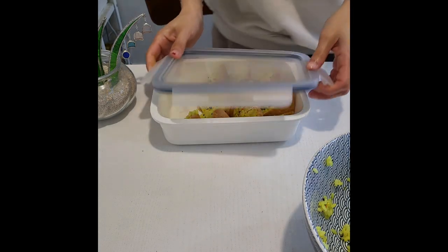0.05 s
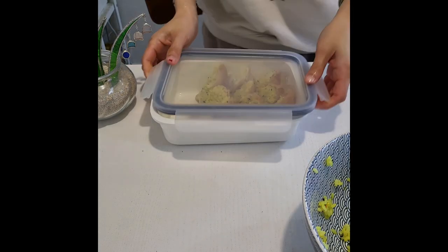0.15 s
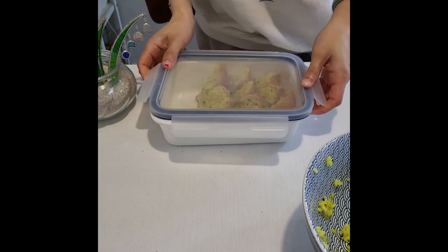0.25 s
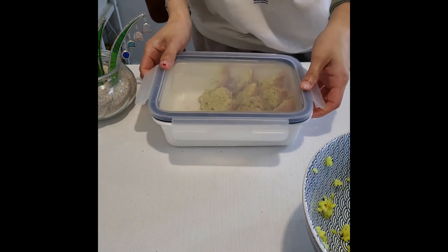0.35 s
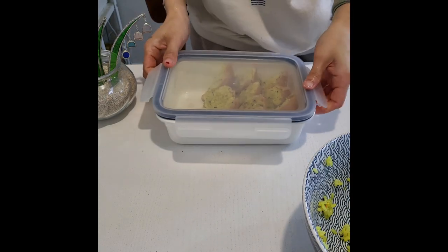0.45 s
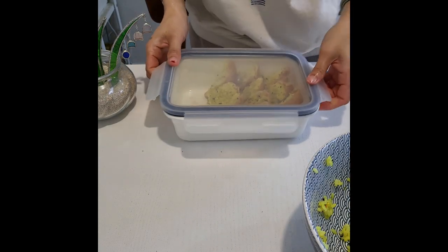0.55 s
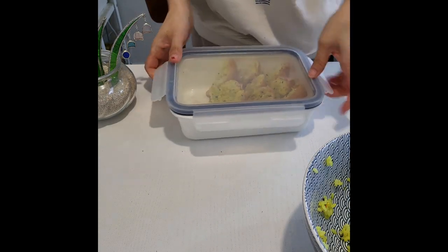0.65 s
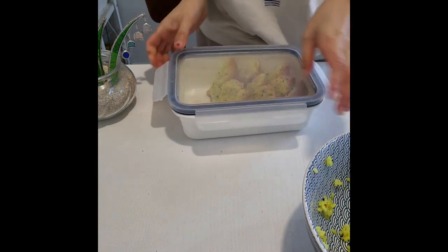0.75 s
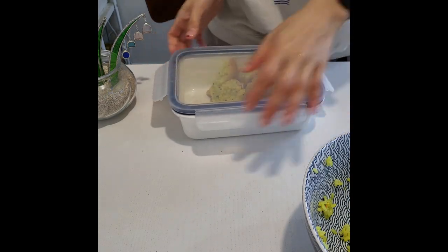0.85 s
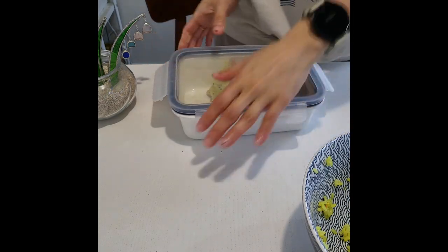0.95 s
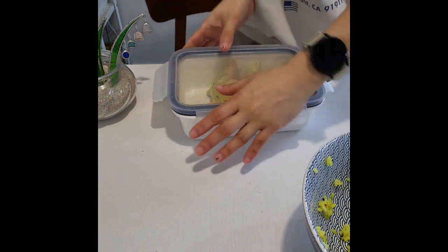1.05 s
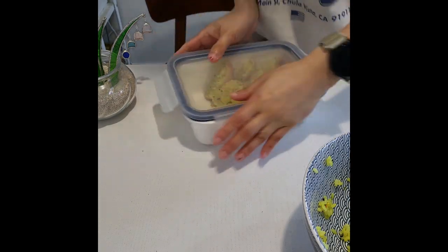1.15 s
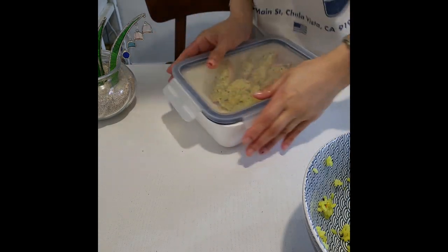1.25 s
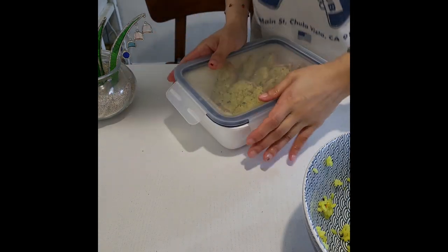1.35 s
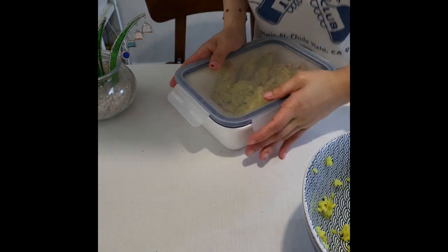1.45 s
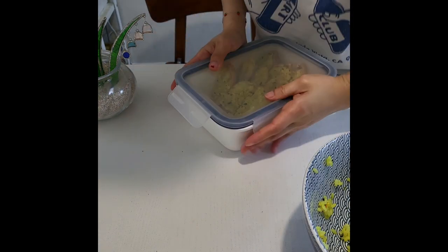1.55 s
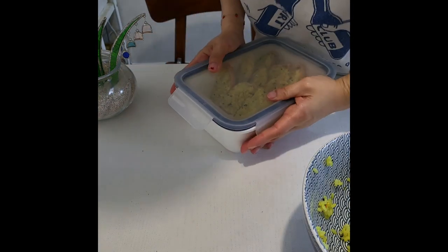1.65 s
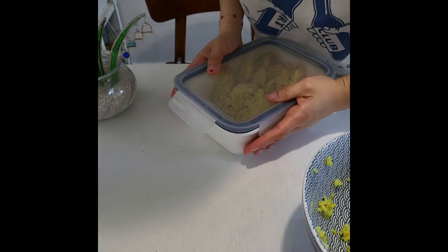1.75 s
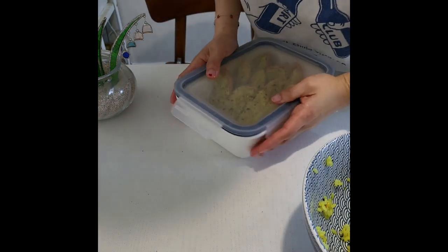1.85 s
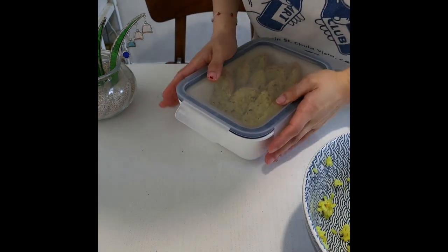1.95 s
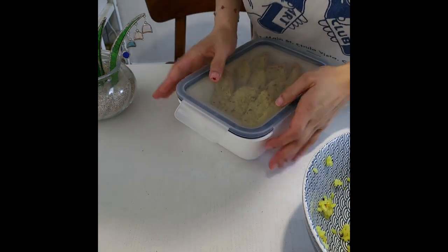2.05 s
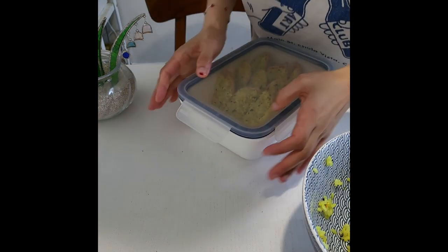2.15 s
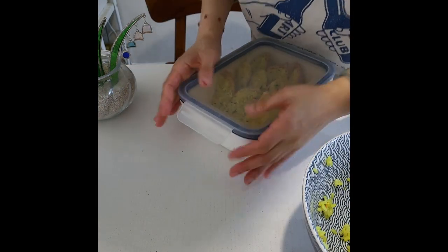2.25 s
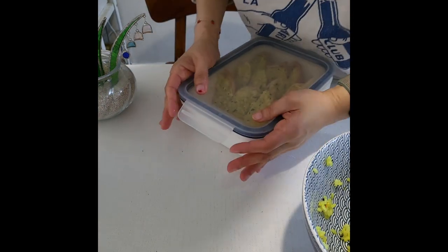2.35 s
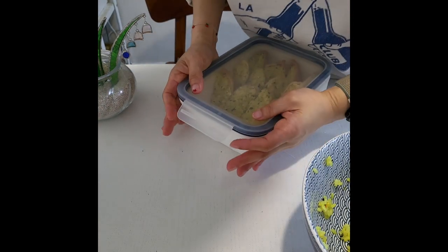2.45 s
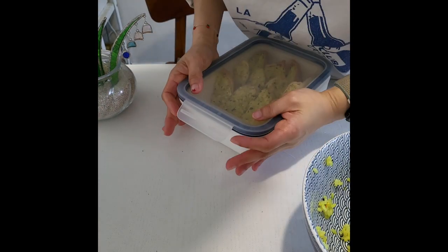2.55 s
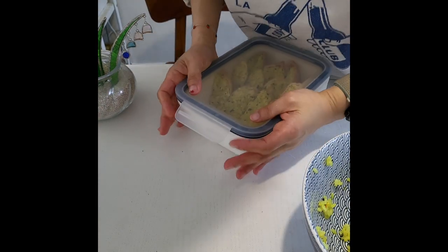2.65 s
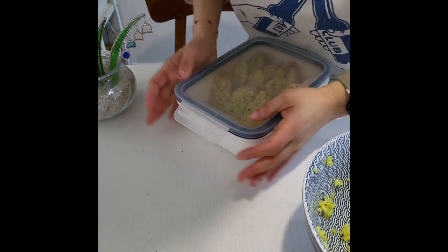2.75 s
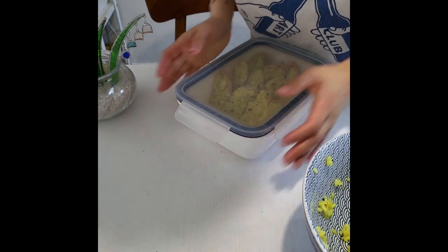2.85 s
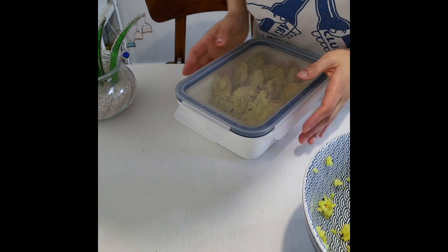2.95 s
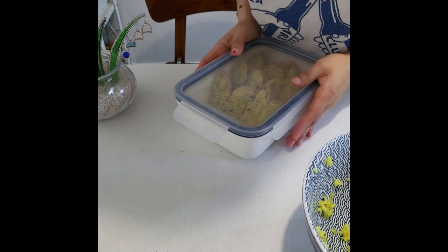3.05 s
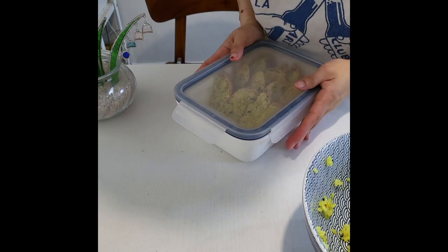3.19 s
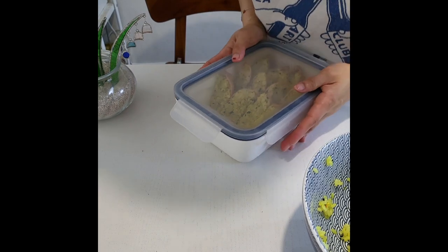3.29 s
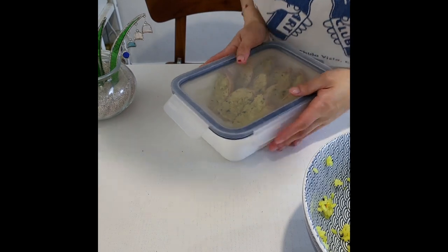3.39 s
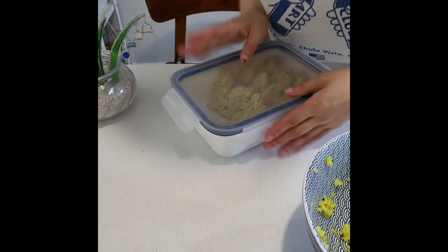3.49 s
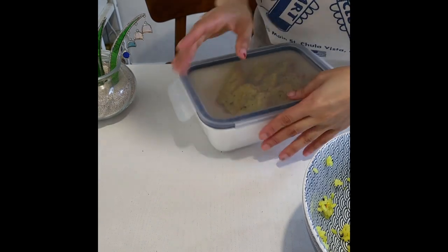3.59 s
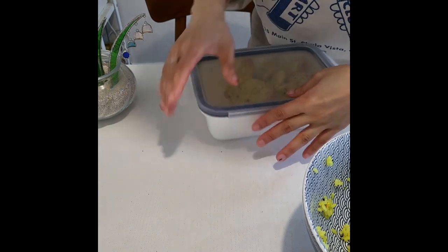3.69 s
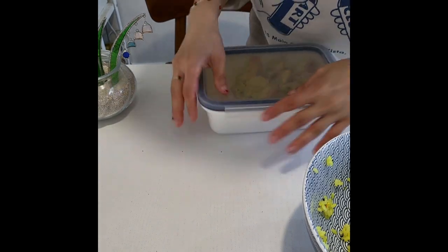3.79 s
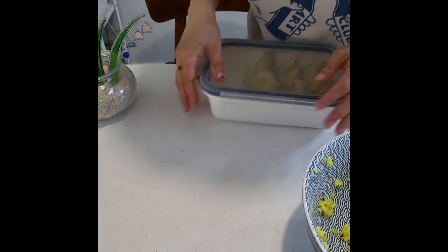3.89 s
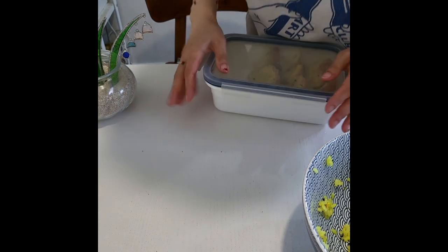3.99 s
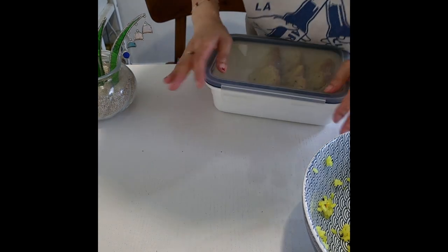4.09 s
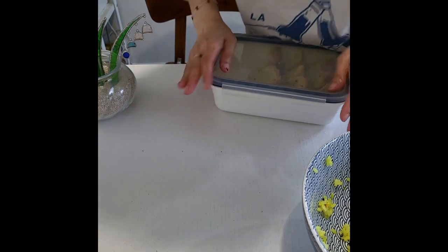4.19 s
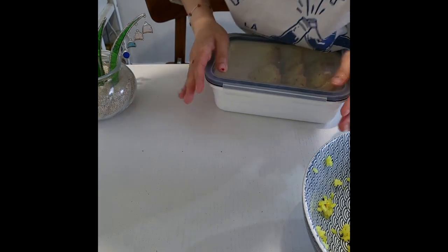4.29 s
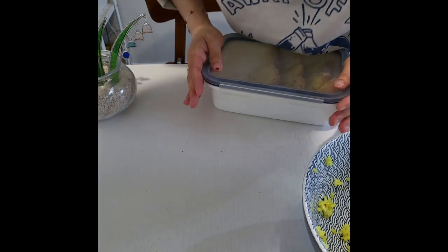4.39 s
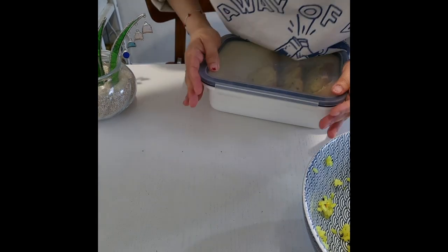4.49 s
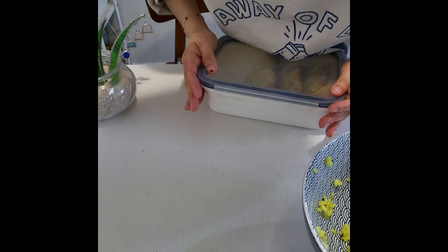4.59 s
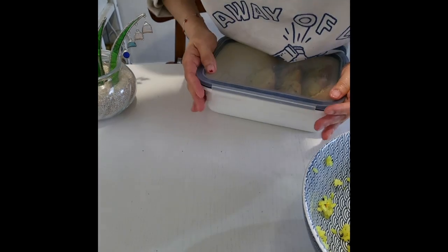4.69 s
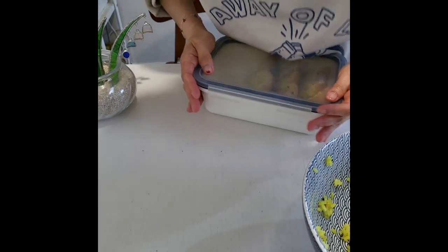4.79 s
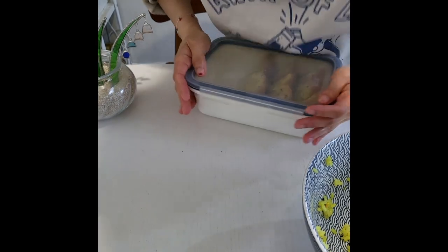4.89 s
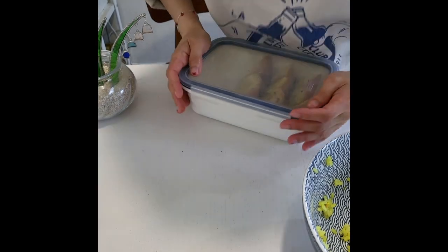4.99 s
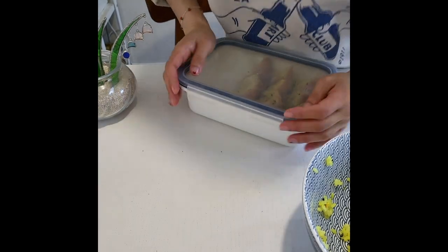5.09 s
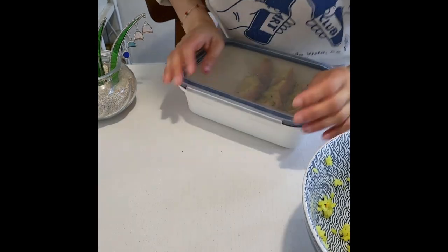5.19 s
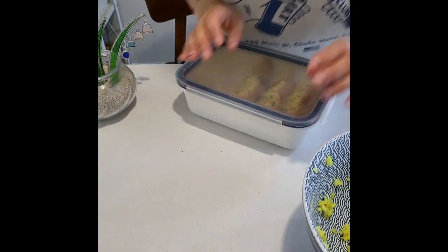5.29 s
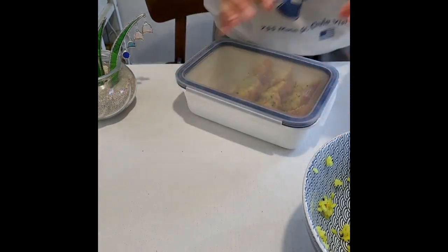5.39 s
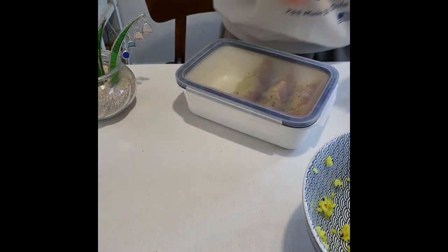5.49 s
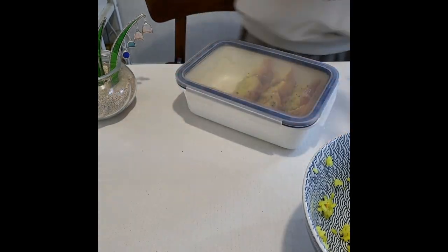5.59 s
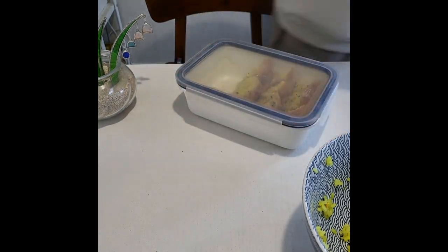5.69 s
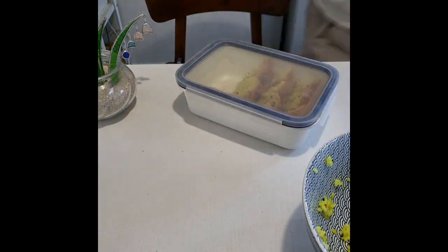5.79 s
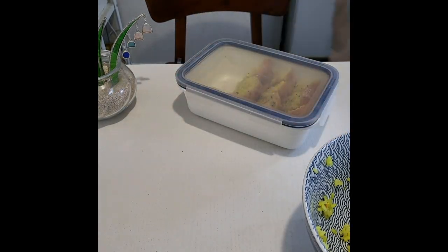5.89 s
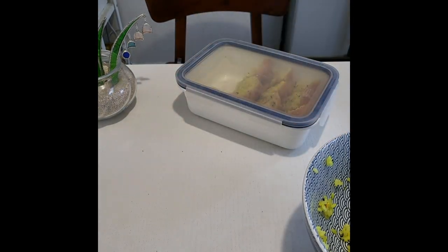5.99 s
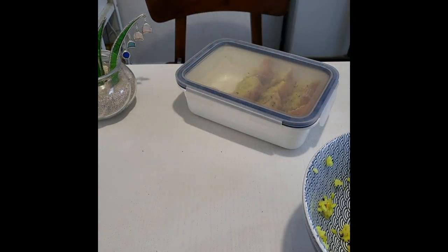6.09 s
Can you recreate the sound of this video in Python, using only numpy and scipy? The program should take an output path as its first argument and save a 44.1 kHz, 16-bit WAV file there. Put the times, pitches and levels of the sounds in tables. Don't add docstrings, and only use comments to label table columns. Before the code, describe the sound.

A plastic lid clatters onto a filled food box, is pressed down with hollow thumps, turned, knocked and snapped shut in a small kitchen.

```python
import sys
import numpy as np
from scipy import signal
from scipy.fft import rfft, irfft, next_fast_len
from scipy.io import wavfile
from scipy.ndimage import uniform_filter1d, map_coordinates

SR = 44100
rng = np.random.default_rng(int(sys.argv[2]) if len(sys.argv) > 2 else 0)


def ratio_of_db(decibels):
    return 10 ** (np.asarray(decibels, float) / 20)


def to_wav(sig):
    pcm = np.clip(np.atleast_2d(sig), -1, 1) * 32767
    pcm = np.round(pcm).astype(np.int16)
    wavfile.write(sys.argv[1], SR, pcm.T)


N = 270774

# frequency in Hz, level in dB, t60 in seconds.
LID_MODES = [(570, 5, 0.0041), (740, 3.5, 0.0038), (1056, -2.5, 0.007), (1610, -4.5, 0.0045),
             (2060, -9.5, 0.003)]
# frequency in Hz, level in dB, t60 in seconds.
LATCH_MODES = [(2080, 4, 0.0048), (3100, 1.5, 0.0043), (4170, 2, 0.0017), (5850, -3, 0.0018)]


def unit(x):
    return x / np.sqrt(np.mean(x ** 2))


def band(x, hz, width_hz):
    return signal.lfilter(*signal.iirpeak(min(hz, .45 * SR), hz / width_hz, fs=SR), x)


def walk(rate_hz, size=N):
    place = np.arange(size) * rate_hz / SR
    return 1.2 * map_coordinates(rng.standard_normal(4096), [place], order=1)


def late(x, delay_s):
    size = next_fast_len(len(x) + 64)
    hz = np.arange(size // 2 + 1) * SR / size
    return irfft(rfft(x, size) * np.exp(-2j * np.pi * hz * delay_s), size)[:len(x)]


def coloured(grit, tones):
    return unit(sum((-1) ** k * ratio_of_db(db) * band(grit, hz, width_hz)
                    for k, (hz, width_hz, db) in enumerate(tones)))


def ring(modes, t, chance, rattle, rattle_db, rattle_t60):
    hz, db, t60 = np.array(modes).T[:, :, None]
    db = db + 1.5 * chance[:len(hz), None]
    hz = hz * (1 + .05 * chance[-len(hz):, None])
    sign = -(-1) ** np.arange(len(hz))[:, None]
    y = np.sum(sign * ratio_of_db(db - 60 * t / t60) * np.sin(2 * np.pi * hz * t), axis=0)
    shaken = signal.fftconvolve(y, rattle * ratio_of_db(rattle_db - 60 * t / rattle_t60))[:len(t)]
    return (y + shaken) / np.abs(y).max()




def snaps():
    # start in seconds, box thump in dB, flap ring in dB, crack in dB, edge tick in dB.
    events = [
        (4.485, -16.5, -10, -25, -51.5),
        (4.494, -29.5, -20, -42.5, -48),
        (4.5695, -27.5, -23.5, -37.5, -48),
        (4.681, -18.5, -9, -26.5, -42),
        (4.694, -40, -22.5, -29.5, -51),
        (4.7399, -31, -23.5, -53, -65),
    ]
    # frequency in Hz, level in dB, t60 in seconds.
    flap_modes = [(520, -8, 0.0068), (675, -2, 0.009), (870, -0.5, 0.006), (1065, 0, 0.0043),
                  (1670, -6, 0.0017)]
    # frequency in Hz, level in dB, t60 in seconds.
    catch_modes = [(2150, -11, 0.0021), (2730, 2, 0.005), (3400, 1, 0.0024), (4270, 0.5, 0.006),
                   (5200, -9, 0.002), (6400, -12, 0.0013), (10970, -22, 0.00054)]
    return [(s, thump_db, 285, ring_db, crack_db, tick_db, flap_modes, catch_modes, False, 0)
            for s, thump_db, ring_db, crack_db, tick_db in events]


def loose_lid():
    # start in seconds, box thump in dB, lid ring in dB, crack in dB.
    landings = [(.019, -33.5, -36.5, -57), (0.135, -62, -39, -64), (0.163, -27, -25, -36.5),
                (0.173, -26, -63, -57), (.208, -18, -26.5, -40), (0.214, -40.5, -47, -43),
                (0.2159, -31, -23, -62), (.243, -26.5, -40, -73), (.345, -42, -26, -66),
                (.353, -14, -18, -49.5), (.356, -22, -20, -38.5), (0.37, -19.5, -37.5, -68.5),
                (.539, -43, -76, -58.5)]
    # start in seconds, box thump in dB, lid ring in dB, crack in dB.
    rattles = [
        (.0195, -40, -24, -60),
        (1.030, -36, -40.5, -62.5),
        (1.040, -62, -42.5, -73),
        (1.208, -44, -39.5, -73),
        (1.245, -30.5, -44, -69),
        (1.257, -47, -40.5, -72),
        (1.442, -43, -26.5, -60),
        (4.500, -35, -21.5, -52),
        (4.716, -42, -32.5, -54),
        (6.018, -42, -47, -66),
    ]
    # frequency in Hz, level in dB, t60 in seconds.
    loose_modes = [(449, 3.5, 0.022), (600, 3, 0.055), (853, 4, 0.01), (1460, -6.5, 0.011)]
    return [(s, thump_db, 280, ring_db, crack_db, crack_db - 12, loose_modes, LATCH_MODES, True, 0)
            for s, thump_db, ring_db, crack_db in landings + rattles]


def knocks():
    # start in seconds, box thump in dB, thump in Hz, hardness in dB.
    events = [(2.018, -22.5, 272, -6.5), (2.187, -25, 274, -12.5), (2.26, -37, 320, 12.5),
              (2.278, -13.5, 274.5, 0), (2.835, -24.5, 280, -3.5), (3.037, -35.5, 310, 8),
              (3.064, -36.5, 279, -10), (3.189, -43.5, 268.6, -34.5), (3.353, -45.5, 276, 1),
              (3.439, -14.5, 280, -0.5), (3.644, -25.5, 285, -12), (3.779, -12, 287.5, -2),
              (3.898, -31.5, 263, -38), (3.958, -15.5, 273, -8), (4.036, -12, 269.6, -1.5),
              (4.154, -13.5, 285, -6.5), (4.196, -11, 294, 1), (4.454, -24, 288, -1.5),
              (4.94, -43.5, 332, 20.5), (4.97, -21.5, 288.9, -36), (6.008, -40, 303, 7)]
    # frequency in Hz, level in dB, t60 in seconds.
    base_modes = [(524, 2, 0.0081), (746, -2, 0.0073), (1150, -3.5, 0.004), (1540, -3.5, 0.004),
                  (2090, -9.5, 0.0016)]
    return [(s, db, hz, db - 12 + 0.07 * hard_db, db - 32.5 + hard_db, db - 44.5 + hard_db,
             base_modes, LATCH_MODES, True, 0)
            for s, db, hz, hard_db in events]


CRACK_LAG_S = .001


def presses():
    # start in seconds, box thump in dB, thump in Hz, lid ring in dB, crack in dB.
    events = [(1.029, -26.5, 286, -45, -73), (1.389, -38, 314, -48, -87), (1.397, -32, 322, -37, -58),
              (1.414, -7, 263, -14, -35.5), (1.534, -63, 211, -41, -81), (1.566, -15.5, 269, -27, -35),
              (1.6, -11, 316, -12, -37.5), (2.4282, -2.5, 290, -6, -33), (3.764, -56, 310, -37, -67),
              (4.311, -40.5, 228.6, -39.5, -52), (4.335, -45.5, 232, -34, -52),
              (4.417, -45.5, 311.4, -48.5, -58.5), (4.479, -19.5, 262.6, -23, -35),
              (4.672, -46, 300, -31, -50.5), (6.013, -39.5, 138, -37, -66)]
    # frequency in Hz, level in dB, t60 in seconds.
    bowed_modes = [(600, 3, 0.0061), (810, 4, 0.0062), (1065, 0.5, 0.0038), (1280, -3, 0.004),
                   (1650, -6, 0.0036), (2060, -13, 0.0047)]
    return [(s, thump_db, hz, ring_db, crack_db, crack_db - 11,
             bowed_modes if thump_db > -12 else LID_MODES, LATCH_MODES, True, CRACK_LAG_S)
            for s, thump_db, hz, ring_db, crack_db in events]


def ticks():
    # start in seconds, tick in dB, body under the tick in dB.
    events = [(.028, -58.5, 14), (1.076, -74, 3), (1.089, -80, 0), (1.099, -71, 7), (1.113, -68, 9),
              (1.372, -63, -15), (1.557, -41.5, 3.5), (1.874, -53, -11), (1.951, -70, 11),
              (2.622, -74, 2.5), (2.686, -73, 2), (2.702, -79, -3), (2.751, -79.5, 8), (3.276, -83, -10),
              (3.308, -63, -32)]
    return [(s, tick_db + body_db + 17, 232.3, tick_db + body_db + 9, tick_db + body_db, tick_db,
             LID_MODES, LATCH_MODES, True, CRACK_LAG_S)
            for s, tick_db, body_db in events]


def box_thump(t, db, hz, chance):
    rise_s = 0.0043
    swell = (t / rise_s * np.exp(1 - t / rise_s)) ** 2.52
    air = ratio_of_db(db + 5.0) * swell * np.sin(2 * np.pi * hz * t)
    side_hz, end_hz = 540 + 35 * chance[0, 4], 455 + 20 * chance[1, 4]
    side_gain = ratio_of_db(db - 5.0 - 60 * t / 0.033) * (1 - np.exp(-t / 0.00073))
    end_gain = ratio_of_db(db - 16.0 - 60 * t / 0.096) * (1 - np.exp(-t / 0.00059))
    side_walls = side_gain * np.sin(2 * np.pi * side_hz * t)
    end_walls = end_gain * np.sin(2 * np.pi * end_hz * t)
    return side_walls - air - end_walls


def all_round(parts):
    blur = 1.13
    power = np.cumsum(sum(np.abs(rfft(p, 4096)) ** 2 for p in parts) + 1e-20)
    k = np.arange(len(power))
    lo, hi = k / blur - 1, k * blur + 1
    even = (np.interp(hi, k, power) - np.interp(lo, k, power)) / (hi - lo)
    cepstrum = irfft(np.log(even + 1e-20) / 2)
    cepstrum[1:len(k) - 1] *= 2
    cepstrum[len(k):] = 0
    return irfft(np.exp(rfft(cepstrum)))[:len(parts[0])]


def blows():
    # frequency in Hz, level in dB, t60 in seconds.
    edge_modes = [(6300, -0.5, 0.0017), (7370, 1.5, 0.0027), (8550, -2, 0.00022), (10200, -11.5, 0.0027),
                  (13550, -30.5, 0.00065)]
    low, bright = np.zeros(N + SR), np.zeros((3, N + SR))
    t = np.arange(3072) / SR
    chances, rattles = rng.standard_normal((96, 3, 10)), rng.standard_normal((96, 3072))
    scatter = np.diff(rng.standard_normal((96, 2, 97))) * ratio_of_db(-9.5 - 60 * t[:96] / 0.004)
    scatter[:, :, 0] = 1
    contacts = snaps() + loose_lid() + knocks() + presses() + ticks()
    for contact, chance, rattle, paths in zip(contacts, chances, rattles, scatter):
        s, thump_db, hz, ring_db, crack_db, tick_db, panel, catch, soft, lag_s = contact
        at = slice(int(s * SR), int(s * SR) + len(t))
        low[at] += box_thump(t, thump_db, hz, chance)
        push = 1 - np.exp(-t / 0.00054) if soft else 1
        lid = ratio_of_db(ring_db + 7.5) * push * ring(panel, t, chance[0], rattle, -25.0, 0.063)
        bite = np.maximum(t - lag_s, 0)
        grit_gain = ratio_of_db(tick_db - 0.5 - 60 * bite / 0.0084) * (bite > 0)
        grit = grit_gain * band(rattle[::-1], 5000, 6000)
        crack = ratio_of_db(crack_db + 14.5) * ring(catch, bite, chance[1], rattle, -22.5, 0.011)
        tick = ratio_of_db(tick_db + 15.0) * ring(edge_modes, bite, chance[2], rattle, -29.5, 0.016)
        parts = [lid, grit, crack, tick]
        ports = [np.convolve(sum(parts), path)[:len(t)] for path in paths]
        bright[:, at] += ports + [all_round(parts)]
    return low[:N], bright[:, :N]


def table_top(thumps):
    # frequency in Hz, level in dB, t60 in seconds.
    modes = [(59, -37.5, 0.35), (138, -21.5, 0.06), (138.1, -4.5, 0.14), (210.2, -10, 0.067),
             (274, -29, 0.086), (332, -51, 0.43)]
    t = np.arange(SR // 2) / SR
    response = sum(ratio_of_db(db) * np.sin(2 * np.pi * hz * t) * ratio_of_db(-60 * t / t60) for hz, db, t60 in modes)
    push = uniform_filter1d(np.abs(thumps), size=100) * 0.24 + thumps
    return signal.fftconvolve(push, response * ratio_of_db(-40.5))[:N]


def drags():
    # start, fastest and stop in seconds, rumble in dB, hiss under the rumble in dB.
    moves = [(-.05, -0.009, 0.18, -37.5, -29), (0.196, 0.32, 0.51, -39, -26.5),
             (0.422, 0.58, 0.75, -45.5, -14), (1.004, 1.192, 1.26, -39.5, -7.5),
             (1.19, 1.258, 1.327, -37, -29), (1.298, 1.32, 1.42, -70.5, 9.5), (1.476, 1.575, 1.74, -48, 2),
             (1.78, 1.956, 1.99, -49.5, -17), (3.416, 3.618, 5, -49.5, -46.5),
             (3.717, 3.87, 4.03, -49.5, -10), (4.202, 4.39, 4.9, -61.5, -6.5),
             (5.856, 5.99, 6.07, -62.5, -31.5), (6.01, 6.013, 6.09, -41.5, -44.5)]
    # frequency in Hz, width in Hz, level in dB.
    rumble_tones = [(145.5, 42, 6), (320, 43.2, 15), (680, 266, 3), (843, 570, -12.5), (1540, 110, -7.5)]
    # frequency in Hz, width in Hz, level in dB.
    hiss_tones = [(2200, 4400, 1), (3260, 1800, 4), (3725, 110, -3), (5300, 6300, -3.5), (7100, 5000, -6),
                  (12000, 5900, -23.5)]
    t, gains = np.arange(N) / SR, np.zeros((2, N))
    for start, fastest, stop, db, hiss_db in moves:
        on = (t > start) & (t < stop)
        speed = np.sin(np.pi / 2 * np.interp(t[on], [start, fastest, stop], [0, 1, 0]))
        gains[:, on] += [ratio_of_db(db) * speed ** 0.96, ratio_of_db(db + hiss_db) * speed ** 4.1]
    out = 0
    for tones, gain in zip((rumble_tones, hiss_tones), gains):
        grit = rng.standard_normal(N) * ratio_of_db(2.5 * walk(70) + 2.5 * walk(400))
        out = out + gain * ratio_of_db(-1.5) * coloured(grit, tones)
    return out


def slide(moves, tones, power, rough_db):
    t, gain = np.arange(N) / SR, np.zeros(N)
    for start, fastest, stop, db in moves:
        gain += ratio_of_db(db) * np.interp(t, [start, fastest, stop], [0, 1, 0]) ** power
    grit = rng.standard_normal(N) * ratio_of_db(rough_db * walk(90))
    return gain * coloured(grit, tones)


def finger_rubs():
    # start, fastest and stop in seconds, level in dB.
    moves = [(0.42, 0.6, 0.73, -61.5), (1.07, 1.22, 1.05, -55), (1.95, 1.96, 2.2, -68),
             (3.04, 3.05, 2.4, -69), (3.33, 3.38, 4.4, -71.5), (3.643, 3.66, 3.7, -64.5),
             (3.79, 3.82, 4, -60), (4.33, 4.36, 3.4, -68), (4.82, 4.9, 4.95, -61),
             (6.005, 6.015, 5.63, -56), (1.3, 1.32, 1.2, -64)]
    # frequency in Hz, width in Hz, level in dB.
    tones = [(704, 440, 2), (1480, 390, 1), (2050, 500, -4), (3040, 1600, -12.5), (4130, 530, -17.5)]
    return slide(moves, tones, power=0.55, rough_db=3.5)


def judder():
    # start, fastest and stop in seconds, level in dB.
    moves = [
        (1.22, 1.255, 1.333, -38),
        (2.6, 2.65, 2.72, -63.5),
    ]
    # frequency in Hz, width in Hz, level in dB.
    tones = [(340, 80, 1), (560, 215, -1.5), (725, 130, -6)]
    return slide(moves, tones, power=0.65, rough_db=3.0)


def sleeve():
    # start, fastest and stop in seconds, level in dB.
    moves = [
        (5.12, 5.18, 4.5, -80.5),
        (5.24, 5.29, 5, -86),
        (5.6, 5.68, 5.75, -78.5),
        (5.84, 6.0, 6.13, -59.5),
    ]
    # frequency in Hz, width in Hz, level in dB.
    tones = [(1101, 680, -2.5), (1900, 850, 0), (4000, 4900, -4), (7540, 5500, -4)]
    return slide(moves, tones, power=1.5, rough_db=1.2)


def chair():
    # start, fastest and stop in seconds, level in dB.
    moves = [
        (6.006, 6.011, 6.1, -48.5),
    ]
    # frequency in Hz, width in Hz, level in dB.
    tones = [(800, 440, 1), (1250, 380, 0), (1770, 550, -1), (2840, 1000, -3.5)]
    return slide(moves, tones, power=1.3, rough_db=4.0)


def far_walls(thump):
    # delay in seconds, level in dB.
    returns = [
        (.033, -16.5),
        (.049, -23.5),
    ]
    return sum(ratio_of_db(db) * np.pad(thump, (int(s * SR), 0))[:N] for s, db in returns)


def room(x):
    # band centre in Hz, t60 in seconds, echo energy in dB.
    bands = [(125, 0.34, 4), (239.7, 0.2, -15), (512, 0.25, -2), (1120, 0.28, 0), (2060, 0.27, -4),
             (3820, 0.29, 0.5), (7840, 0.4, -16.5), (14350, 0.39, 0.5)]
    t = np.arange(32768) / SR
    patchy = ratio_of_db(2.5 * walk(300, size=len(t)) * np.exp(-t / .05))
    tail = 0
    for hz, t60, db in bands:
        mid, side = (band(band(rng.standard_normal(len(t)), hz, hz), hz, hz) for _ in range(2))
        apart = np.clip(hz / 780, .3, 1.)
        fade = ratio_of_db(db - 60 * t / t60) * np.sqrt(np.log(1000) / t60 / SR)
        tail = tail + fade * (mid + apart * side * np.array([[1], [-1]]))
    tail = tail * patchy * np.clip((t - .001) / .003, 0, 1)
    return signal.fftconvolve(x[None], tail, axes=1)[:, :N]


def kitchen():
    # frequency in Hz, level in dB per Hz.
    air_colour = [(25, -30), (50, 3.5), (90, -19.5), (300, -18.5), (500, -29.5), (1000, -39), (2000, -48.5),
                  (3500, -53.5), (5000, -50), (8000, -50.5), (12000, -54.5), (16000, -69)]
    # frequency in Hz, width in Hz, level in dB.
    hum_lines = [(52.7, 27, -56), (141, 11, -62), (259.4, 10, -68), (400, 4, -73.5)]
    size = next_fast_len(N)
    hz = np.arange(1, size // 2 + 2) * SR / size
    colour_hz, colour_db = np.array(air_colour).T
    colour = ratio_of_db(np.interp(np.log(hz), np.log(colour_hz), colour_db, left=-60))
    mid, side = rfft(rng.standard_normal((2, size))) * colour
    air = irfft(mid + np.clip(hz / 420.0, .25, 1.) * side * np.array([[1], [-1]]), size)[:, :N]
    hum = 0
    for line_hz, width_hz, db in hum_lines:
        noise = rng.standard_normal(N) + 0.5 * rng.standard_normal((2, N))
        hum = hum + ratio_of_db(db) * unit(band(band(noise, line_hz, width_hz), line_hz, width_hz))
    return ratio_of_db(-54 + 0.58 * walk(3)) * unit(air) + hum


def scene():
    low, bright = blows()
    bright = bright + drags() + finger_rubs()
    thump = signal.sosfilt(signal.butter(2, 90, "highpass", fs=SR, output="sos"), low)
    low = thump + table_top(low)
    near = low + far_walls(thump)
    bass_lead_s, treble_lead_s = .00017, .00022
    far = late(near, bass_lead_s) + late(bright[1], treble_lead_s)
    direct = np.array([near + bright[0], far])
    heard = direct + room(low + bright[2]) + kitchen() + judder()
    return heard + np.array([sleeve() + chair() for port in range(2)])


def band_limit(x):
    return signal.sosfilt(signal.butter(12, 16630, fs=SR, output="sos"), x)


def record(dry):
    bass_cut = signal.butter(5, 40, "highpass", fs=SR, output="sos")
    top_cut = signal.ellip(8, 1, 60, 15850, fs=SR, output="sos")
    limited = dry / (1 + dry ** 8) ** (1 / 8)
    return band_limit(signal.sosfilt(np.vstack([bass_cut, top_cut]), limited))


dry = scene()
out = record(dry)
to_wav(out)
```